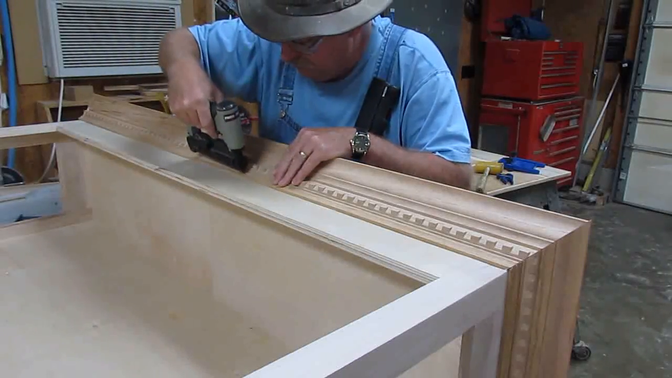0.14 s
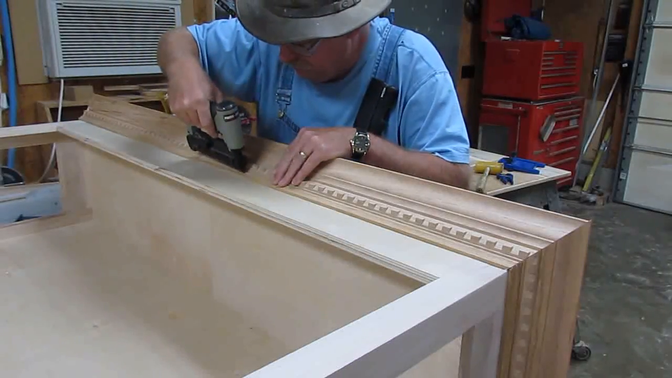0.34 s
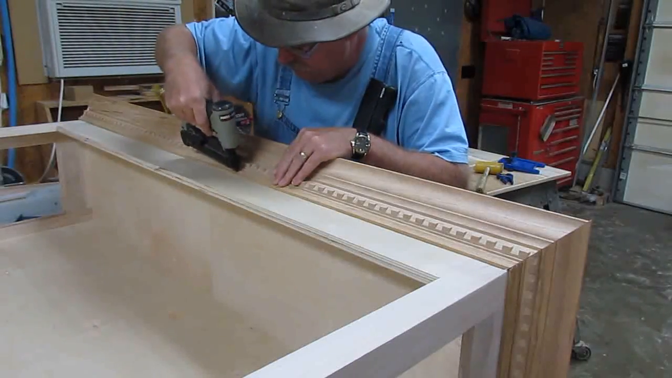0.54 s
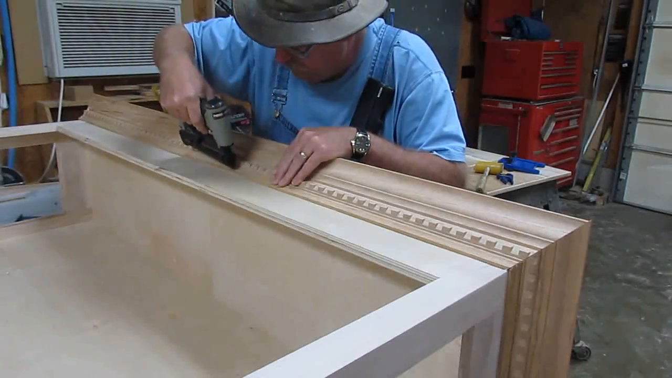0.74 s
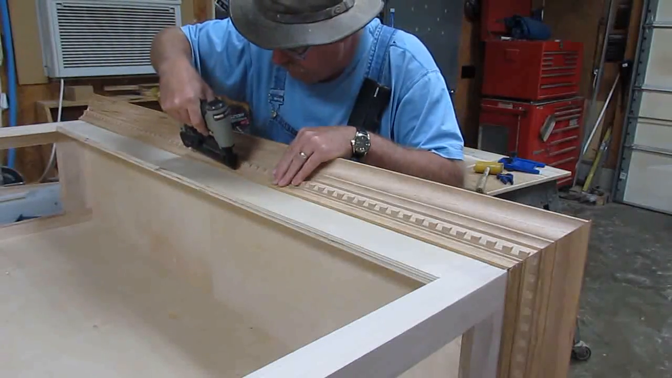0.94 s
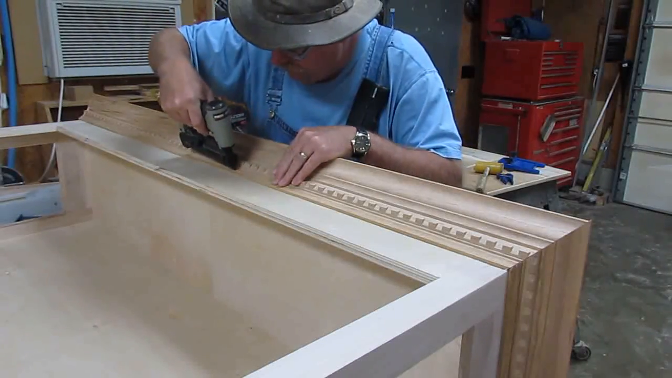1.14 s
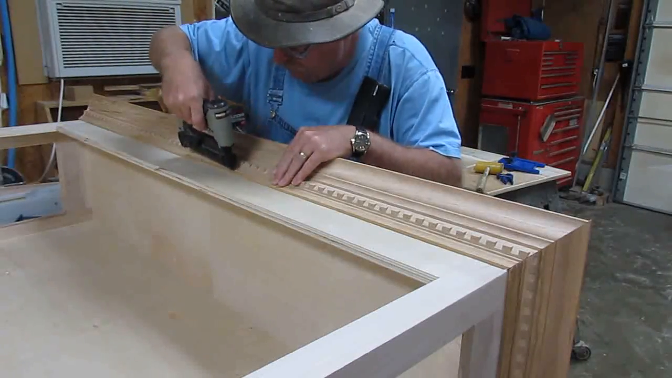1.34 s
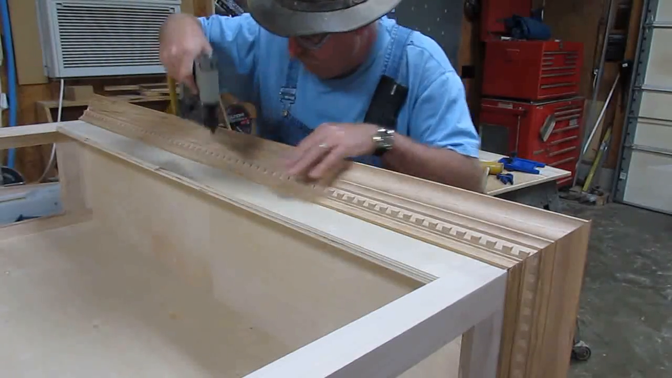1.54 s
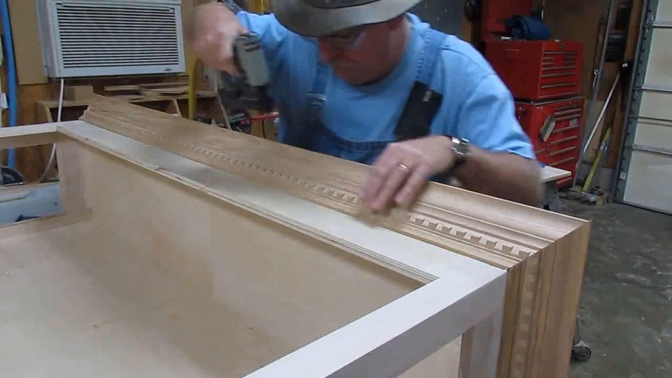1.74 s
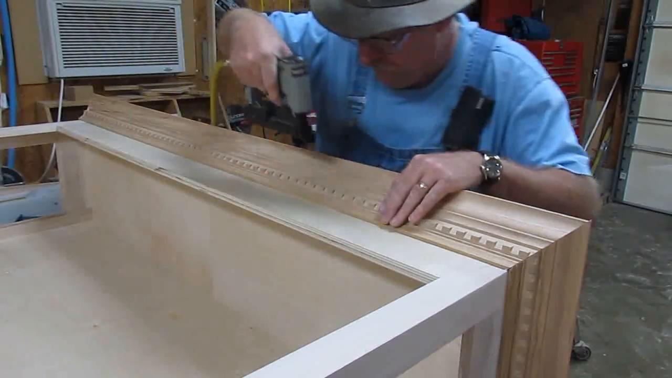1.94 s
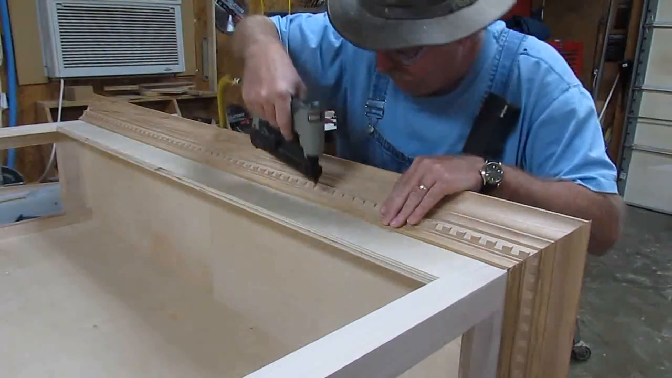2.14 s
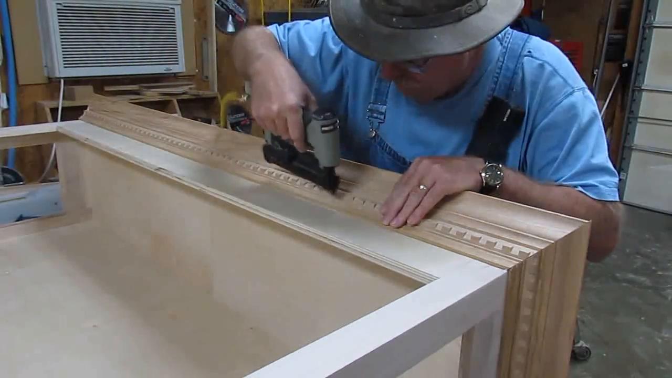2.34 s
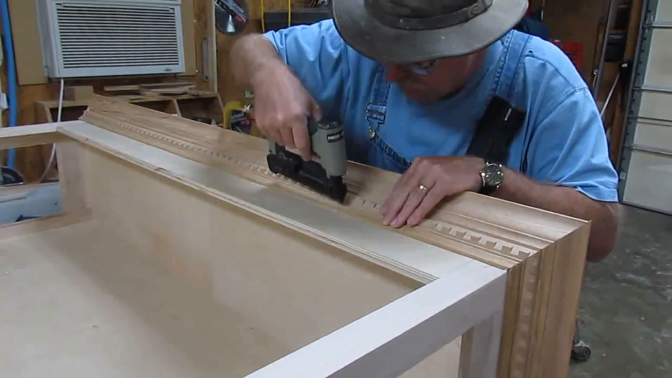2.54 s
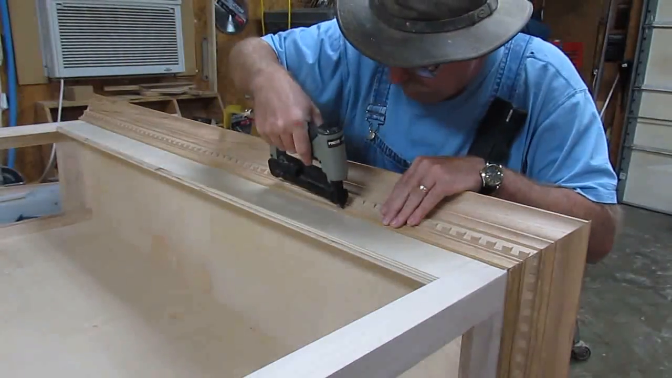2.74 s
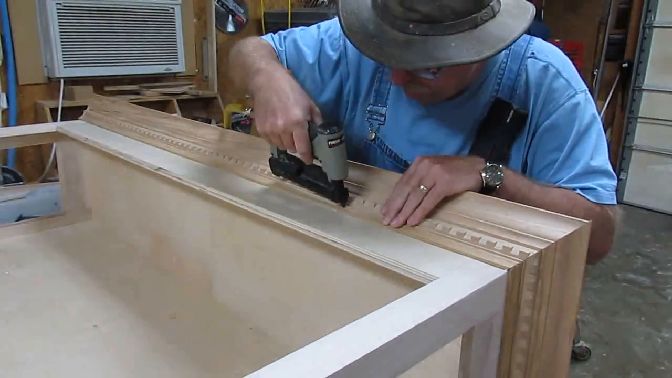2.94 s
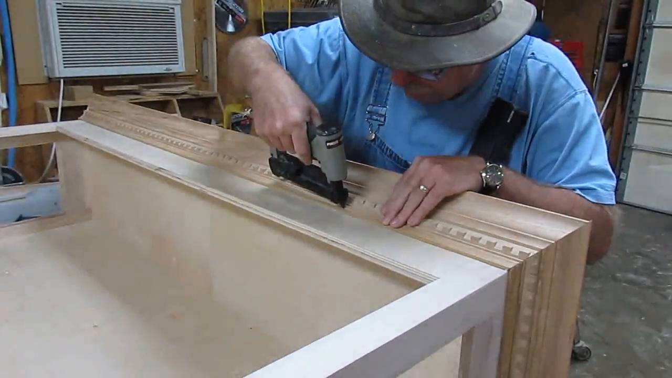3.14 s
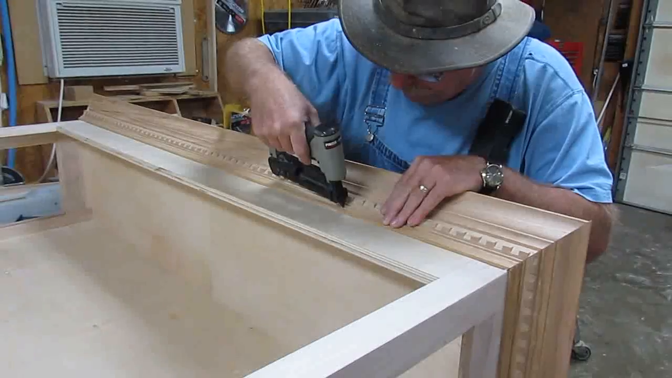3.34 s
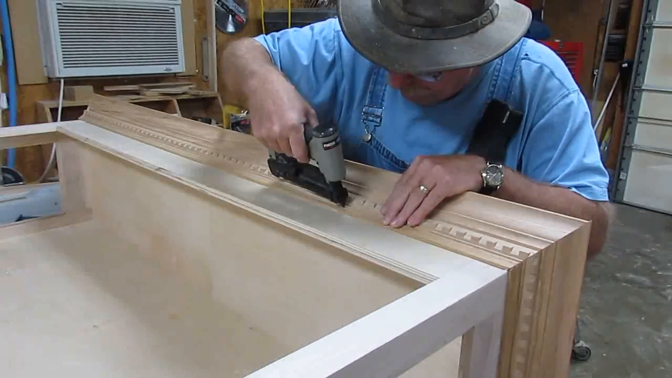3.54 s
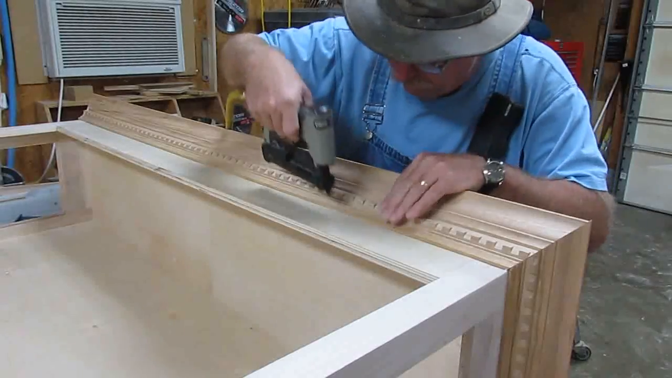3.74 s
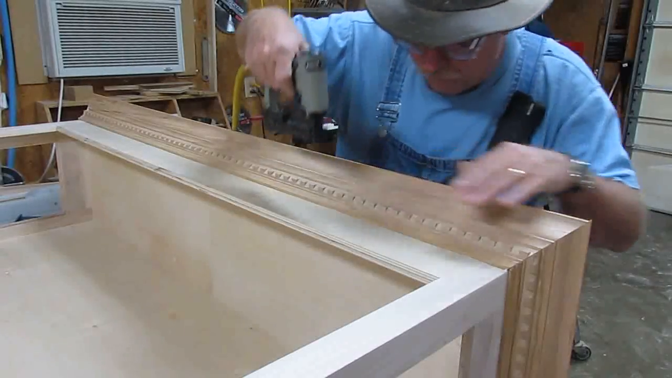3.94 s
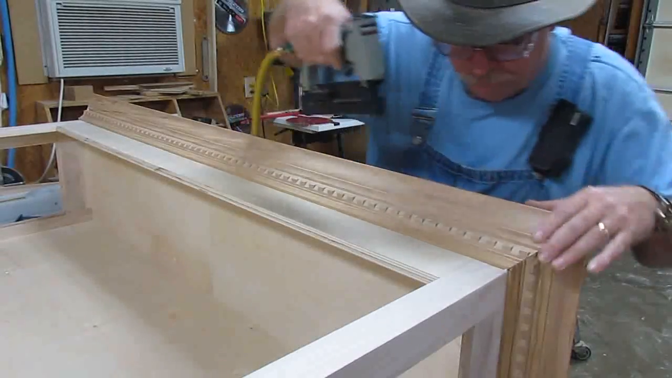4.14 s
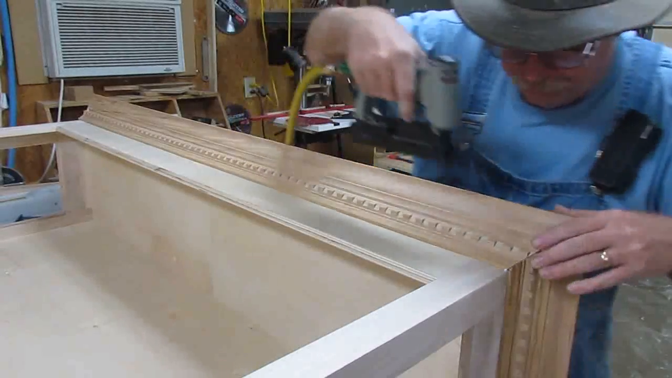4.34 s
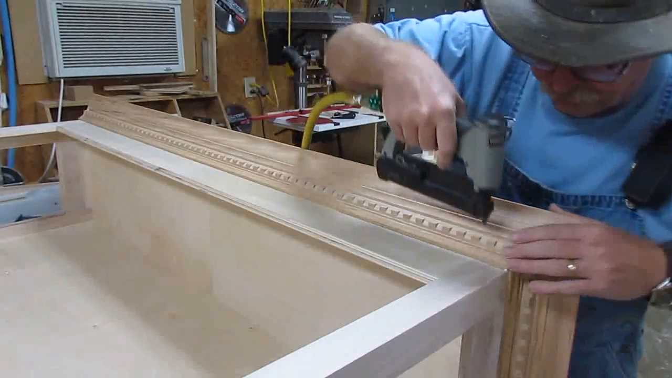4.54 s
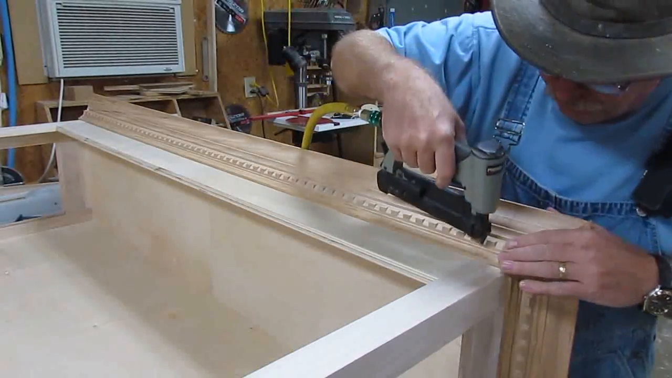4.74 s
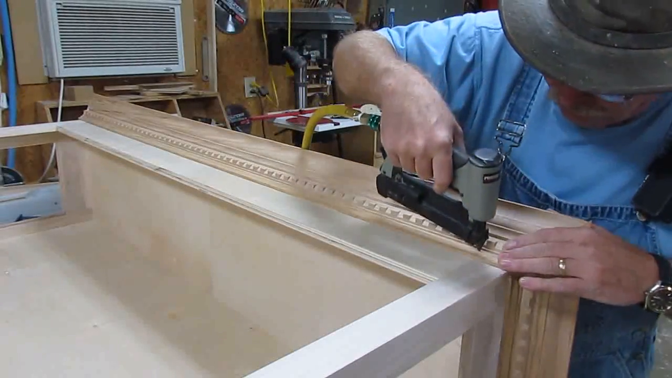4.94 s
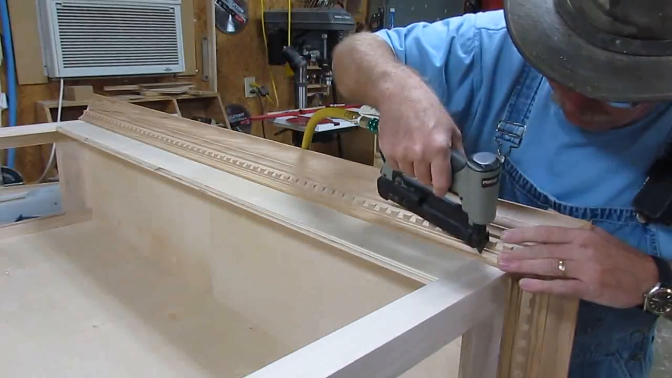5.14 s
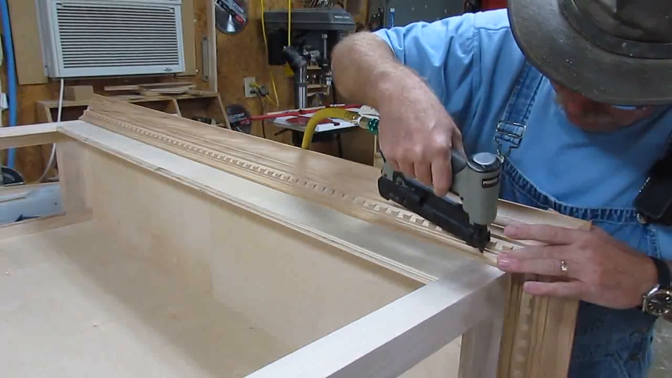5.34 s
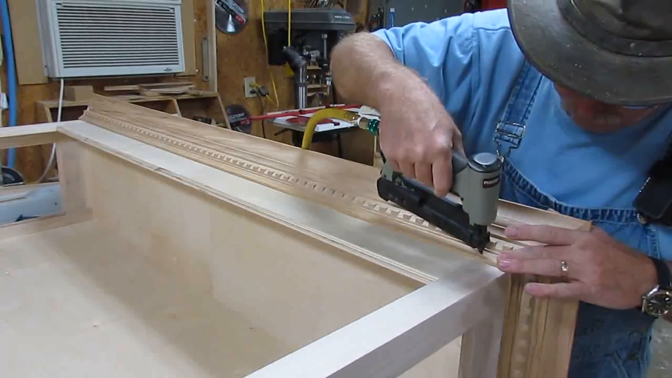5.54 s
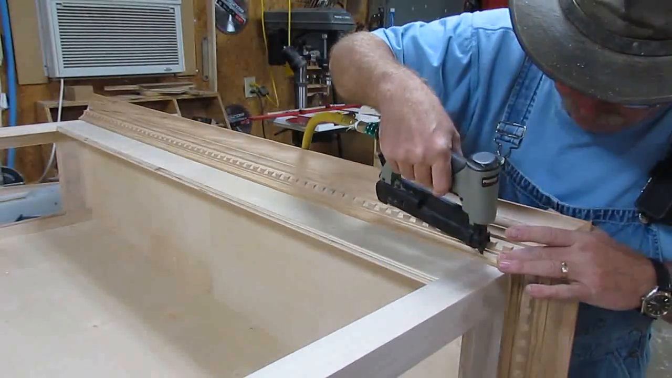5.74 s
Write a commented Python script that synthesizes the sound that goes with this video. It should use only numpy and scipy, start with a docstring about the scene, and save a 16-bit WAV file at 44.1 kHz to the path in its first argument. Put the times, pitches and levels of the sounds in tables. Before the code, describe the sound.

Close stereo microphones in a reverberant workshop: a pin nailer fires three times into a hollow wooden cabinet, each shot a bright, hard air crack followed quickly by a double-edged venting hiss. Between shots the tool lands with small knocks and scrapes, and a hand brushes over the wood. A steady low fan hum stays behind, dipping after each blast.

```python
"""Pin nailer on a hollow cabinet

Workshop interior, near stereo microphones: a pneumatic pin nailer fires three pins into cabinet molding.
Each shot is shaped noise for the air and filtered blows on ringing plywood; release vents a row of puffs.
Between shots the tool lands and scrapes, and a hand slides over the wood, as swelling noise and knocks.
Behind it a fan hums as coloured noise and the room adds a diffuse tail; the gain ducks on loud sound."""
import sys
import numpy as np
from scipy import signal
from scipy.fft import rfft, irfft
from scipy.io import wavfile
from scipy.ndimage import uniform_filter1d

SR = 44100
rng = np.random.default_rng(int(sys.argv[2]) if len(sys.argv) > 2 else 0)


def int16_out(signal):
    """Quantize to a 16-bit WAV file."""
    q = np.round(np.clip(np.atleast_2d(signal).T, -1, 1) * 32767)
    wavfile.write(sys.argv[1], SR, q.astype(np.int16))


N = 255320  # samples

# Fan hum, a spectrum of relative level: [f/Hz, level/dB per Hz]
HUM_SPECTRUM = [(15, -37), (25, -6), (87, -6), (175, -11), (212, -10.5), (363, -12.5), (516, -15.5),
                (887, -17.5), (1040, -16.5), (1160, -16.5), (1890, -21.5), (4740, -26), (16000, -35.5)]
HUM_DB = -58.5
FAN_TONE_HZ, FAN_TONE_DB = 1630, -76.5

# Room decay: [f/Hz, t60/s]
ROOM_T60 = [(100, 1), (260, 0.6), (700, 0.7), (1840, 0.81), (4850, 0.71), (12800, 0.38)]
# Room tail, relative spectrum: [f/Hz, level/dB]
ROOM_COLOUR = [(60, -3.5), (300, 13.5), (1000, 5), (3500, 9.5), (8000, 3), (15000, -3)]
ROOM_DB, ROOM_FADE_IN_S = -5.5, 0.0023

# Stereo width of diffuse sound: [f/Hz, side minus mid level/dB]
FAR_SIDE = [(60, -18.5), (110, 2), (200, -13), (380, -7.5), (700, -6), (1290, -5), (2380, -2.5), (4400, -3),
            (8120, 0), (15000, 0)]
NEAR_SIDE_DB, RUMBLE_SIDE_DB = -6.5, -6
LEFT_DB = -0.6  # the right gets the opposite

# Skin on wood, relative spectrum: [f/Hz, level/dB per Hz]
SKIN_SPECTRUM = [(880, -47), (1500, -12.5), (2230, -11), (4920, -8.5), (9010, -14), (13100, -23),
                 (14300, -21.5), (16000, -64.5)]
# Scraping on wood, relative spectrum: [f/Hz, level/dB per Hz]
SCRAPE_SPECTRUM = [(260, -45.5), (450, -4.5), (902, -0.5), (991, -1), (1580, -6), (1840, -12.5),
                   (3500, -15.5), (4550, -56.5), (7700, -120)]
# Hand and sleeve slide over the wood: [t/s, level/dB, rise/s, hold/s]
SLIDES = [(.1, -74, .05, .06), (.35, -56, 0.025, .06), (.48, -60.5, 0.047, .42), (1.7, -62, 0.024, .04),
          (1.79, -56, 0.011, .11), (1.93, -44, .06, 0.089), (2.0, -42, 0.11, 0.046),
          (2.3, -59.5, 0.019, .13), (2.7, -65.5, 0.068, .1), (3.1, -65, 0.11, .12), (3.9, -56.5, .06, .03),
          (4.08, -52.5, 0.017, .012), (4.25, -41.5, 0.15, .07), (4.68, -64.5, 0.032, .3),
          (5.2, -73, 0.024, .3)]
SLIDE_RISE_DB, SLIDE_FALL_DB_PER_S, SLIDE_BODY_DB = 19, 93.5, -16
# The tool's nose scrapes: [t/s, level/dB, rise/s, hold/s, chatter f/Hz, chatter level/dB]
SCRAPES = [(0.113, -72, 0.014, 0.065, 573, -48), (.36, -48, .035, 0.032, 1250, -51),
           (.49, -52, .025, 0.012, 2200, -56.5), (0.607, -51.5, .018, 0.011, 2490, -57.5),
           (.8, -58, .026, .04, 1200, -66), (2.32, -64, .03, .02, 900, -76),
           (4.09, -70.5, .03, 0.014, 1700, -66.5)]
SCRAPE_RISE_DB, SCRAPE_FALL_DB_PER_S = 13, 139
CHATTER_PER_S, CHATTER_CYCLES = 900, 19.5  # mean slip rate; cycles in a ring's t60
# Tool and hand press on the cabinet, one list per stretch between shots: [t/s, level/dB]
PRESSING = [
    [(0.0, -62), (0.136, -51), (0.25, -56), (0.752, -53.5), (0.906, -60.5), (1.1, -54)],
    [(1.72, -61.5), (2.056, -68.5), (2.354, -69), (2.638, -59), (2.766, -58.5), (2.842, -58), (3.42, -58.5)],
    [(3.9, -58), (4.192, -56), (4.382, -64.5), (5.052, -70.5), (5.374, -58.5), (5.494, -63), (5.57, -64.5)],
]
PRESSING_SCRAPE_DB, FRICTION_BAND_HZ = -12, (75, 460)

# Plywood cabinet modes: [f/Hz, level/dB, t60/s]
CABINET = [(44.77, -9.5, 0.16), (88.2, -6.5, 0.2), (141, -8.5, 0.15), (202.1, -5, 0.098),
           (261, -3.5, 0.064), (341.4, -5, 0.057), (484, -6.5, 0.044), (574, -7, 0.06), (656, -8, 0.052),
           (752, -5.5, 0.035), (870, -4.5, 0.038), (963, -14, 0.071), (1153, -1, 0.018),
           (1420, -7.5, 0.025), (1860, -11.5, 0.018), (2820, -12, .012)]
# The tool's mass shoves the panel, dry and short: [f/Hz, level/dB, t60/s]
THUMP = [(75, -5, 0.022), (210.4, -5, 0.014)]
# Knocks on the wood, each with fading repeats: landings of tool or hand, and a second thud
# during shot 2's venting: [t/s, click level/dB, click f/Hz, tap level/dB, tap f/Hz, thud level/dB,
# thud lag/ms, repeat gap/ms, loss per repeat/dB, thud lowest f/Hz, thud highest f/Hz]
KNOCK_SERIES = [(.066, -38, 1330, -38, 810, -31.5, -3, 27, 1.5, 77.7, 330),
                (0.813, -57, 1520, -59, 700, -37, 0.5, 26, 4.5, 82, 284),
                (2.581, -41.5, 2180, -40, 659, -36, -2.5, 24, 1.5, 75, 240),
                (2.8895, -41, 2630, -37, 610, -26, 8.5, 22, 7.5, 138, 290.4),
                (3.582, -40, 2300, -51, 600, -18, 1, 30, 6, 250, 432),
                (3.986, -59, 1980, -40, 680, -38.5, 2.5, 45, 4.5, 99, 430),
                (4.637, -58.5, 2020, -49, 534, -44.5, 4.5, 33, 4.5, 70, 322),
                (5.298, -39.5, 2166, -33.5, 900, -27.5, 3.5, 30, 7.5, 72.1, 276)]
TAP_SPREAD, REPEAT_JITTER = 1.4, .12  # factor down and up; multiplies half a normal draw
CLICK_T60_MS, CLICK_RING_DB, CLICK_RING_T60_S = 42, -7, 0.0062

# Shots: [t/s, level/dB, valve opening/ms, driver stroke/ms, driver clack f/Hz, blow delay/ms,
# blow level/dB, recoil level/dB, rebound level/dB, rebound f/Hz, trigger held/s, piston return level/dB]
SHOTS = [(1.1238, 1.5, 1.7, 5.9, 3400, 0.54, -18.5, -16.5, -5, 780, .1391, -22),
         (3.444, 1, 1.2, 7.3, 4830, 0.35, -16.5, -13.5, -20.5, 460, .1055, -21.5),
         (5.5860, 0, 4, 8.5, 4050, 7.5, -22, -21, -35.5, 600, .1493, -23.5)]
# Parts of the driver's blow on the wood: [delay/ms, level/dB, lowest f/Hz, highest f/Hz]
BLOW = [(0.1, 4.5, 150, 2400), (4.499, -3, 400.6, 1708)]
REBOUND_MS, REBOUND_SPREAD = 12, 1.3  # delay after the blow; factor down and up
RETURN_MS, RETURN_BAND_HZ, RETURN_THUMP_DB = 1.58, (184, 790), 9

# Air puffs along the driver's stroke: [t/share of stroke, level/dB, rise/ms, t60/ms, nominal f/Hz]
STROKE = [(.58, 2.5, 1.6, 25, 8300), (0.6, -3, 1.5, 50, 1720)]
# Puffs of the venting valve after release: [delay/ms, level/dB, rise/ms, t60/ms, nominal f/Hz]
VENT = [(0.0927, -4, 0.94, 20.4, 10300), (4.484, -5.5, 2.4, 120, 25000), (7.014, -12.5, 1.5, 280, 8600),
        (2.95, -2, 1.04, 19, 1480), (33.2, 11, 2.1, 12, 9500), (40.12, 4.9, 0.89, 18.5, 19000),
        (44.7, 4.5, 2.12, 18.6, 6270), (43.5, -10, 3.6, 62, 1560)]
# Faint high ticks of the tool: [t/s, level/dB, t60/ms, nominal f/Hz]
TICKS = [(1.7933, -45, 180, 6000), (5.1988, -43, 22, 6900), (5.582, -32, 41, 7930)]
TICK_RISE_MS = .4
# The tool's metal rings after a puff: [f/Hz, level/dB, t60/s]
METAL = [(3110, -24.5, .017), (3890, -23, .017)]
OPENING_DB, OPENING_T60_MS, OPENING_HZ, OPENING_SHOULDER = 1, 49, 9720, 0.27
CLACK_DB, CLACK_RISE_MS, CLACK_T60_MS = 2.26, 0.22, 18
NOZZLE_HZ, NOZZLE_DB, NOZZLE_T60_S = 9100, -21, 0.0024
AIR_LOW_HZ = 600

# Microphone and recorder; the fall of the held excess is scaled by the squeeze
MIC_HZ, CUTOFF_HZ = 13200, 16200
KNEE_DB, EXCESS_FALL_DB_PER_S, SQUEEZE = -28, 19, 0.39


def amp(db):
    """Decibels to gain."""
    return 10 ** (np.asarray(db) / 20)


def rms_one(x):
    """Scale to rms 1."""
    return x / np.sqrt(np.mean(x ** 2) + 1e-20)


def at_hz(points, hz):
    """Read a (Hz, value) table on a log frequency axis."""
    table_hz, values = np.transpose(points)
    return np.interp(np.log(hz), np.log(table_hz), values)


def band_pass(x, low_hz, high_hz):
    """Keep the sound between two frequencies."""
    return signal.sosfilt(signal.butter(2, [low_hz, high_hz], "band", fs=SR, output="sos"), x)


def ring(x, modes):
    """Excite parallel resonances that each decay exponentially, with alternating signs."""
    out = 0
    for k, (hz, db, t60) in enumerate(modes):
        radius = amp(-60 / (max(t60, .001) * SR))
        angle = 2 * np.pi * hz / SR
        poles = [1, -2 * radius * np.cos(angle), radius * radius]
        mode = signal.lfilter([0, np.sin(angle)], poles, x + 1e-18)
        out = out + (-1) ** k * amp(db) * mode
    return out


def to_stereo(mid, side):
    """Mid and side to left and right."""
    return np.array([mid + side, mid - side])


def coloured(spectrum, size=N):
    """Diffuse stereo noise of a given spectrum, at rms 1."""
    hz = np.maximum(np.fft.rfftfreq(size, 1 / SR), 10)
    mid, side = rfft(rng.standard_normal((2, size))) * amp(at_hz(spectrum, hz))
    side = side * amp(at_hz(FAR_SIDE, hz))
    return rms_one(irfft(to_stereo(mid, side), size))


def swell(rows, rise_db, fall_db_per_s):
    """Gain of strokes that rise, hold and fall in dB; overlapping ones add in power."""
    t, power = np.arange(N) / SR, 0
    for s, db, rise_s, hold_s in rows:
        rise_below = rise_db * np.maximum(1 - (t - s) / rise_s, 0)
        fall_below = fall_db_per_s * np.maximum(t - s - rise_s - hold_s, 0)
        power = power + amp(db - rise_below - fall_below) ** 2
    return np.sqrt(power)


def fan():
    """Steady broadband hum, with a faint narrow band where noise excites one resonance."""
    tone = rms_one(ring(rng.standard_normal(N), [(FAN_TONE_HZ, 0, .3)]))
    return amp(HUM_DB) * coloured(HUM_SPECTRUM) + amp(FAN_TONE_DB) * tone


def workshop(x):
    """Reverberation: the sound is spread by diffuse noise that dies band by band."""
    size = SR + SR // 4
    t, tail = np.arange(size) / SR, 0
    noise = [coloured(ROOM_COLOUR, size), coloured(ROOM_COLOUR, size)]  # neighbouring bands are unrelated
    edges = 45 * 2 ** np.arange(0, 9, .5)
    for k, (low, high) in enumerate(zip(edges, edges[1:])):
        decay = amp(-60 * t / at_hz(ROOM_T60, np.sqrt(low * high)))
        tail = tail + band_pass(noise[k % 2], low, high) * decay
    tail = tail * np.clip(t / ROOM_FADE_IN_S, 0, 1) ** 2
    tail = tail / np.sqrt(np.sum(tail ** 2) / 2)
    return amp(ROOM_DB) * signal.fftconvolve(x[None], tail, axes=1)[:, :N]


def chatter():
    """The scraping nose sticks and slips at random, and each slip rings briefly."""
    slips = (rng.random(N) < CHATTER_PER_S / SR) * rng.standard_normal(N)
    out = 0
    for s, _, rise_s, hold_s, hz, db in SCRAPES:
        gain = swell([(s, db, rise_s, hold_s)], SCRAPE_RISE_DB, SCRAPE_FALL_DB_PER_S)
        out = out + gain * rms_one(ring(slips, [(hz, 0, CHATTER_CYCLES / hz)]))
    return out


def handling():
    """Skin hisses on the wood, the tool scrapes and chatters, and friction rumbles in the cabinet."""
    t = np.arange(N) / SR
    pressing = 0
    for rows in PRESSING:
        pressing = pressing + amp(np.interp(t, *np.transpose(rows), left=-200, right=-200))
    pressing = uniform_filter1d(pressing, size=800)

    skin = swell(SLIDES, SLIDE_RISE_DB, SLIDE_FALL_DB_PER_S)
    scrape = swell([row[:4] for row in SCRAPES], SCRAPE_RISE_DB, SCRAPE_FALL_DB_PER_S)
    scrape = scrape + amp(SLIDE_BODY_DB) * skin + amp(PRESSING_SCRAPE_DB) * pressing
    # the scrape catches and slips: its level wavers by 1.4 dB rms
    grit = amp(1.4 * rms_one(uniform_filter1d(rng.standard_normal(N), size=150)))
    scraping = scrape * rms_one(grit * coloured(SCRAPE_SPECTRUM))

    friction = band_pass(rng.standard_normal((2, N)), *FRICTION_BAND_HZ)
    mid, side = pressing * rms_one(ring(friction, CABINET))
    rumble = to_stereo(mid, amp(RUMBLE_SIDE_DB) * side)
    return skin * coloured(SKIN_SPECTRUM) + scraping + chatter() + rumble


def repeating_blows():
    """Each knock is a tap and a thud with four fading repeats, as (s, dB, lowest Hz, highest Hz)."""
    rows = []
    uneven = rng.standard_normal((len(KNOCK_SERIES), 5))
    for knock, chance in zip(KNOCK_SERIES, uneven):
        s, _, _, tap_db, tap_hz, thud_db, lag_ms, gap_ms, loss_db, *band = knock
        rows.append((s, tap_db, tap_hz / TAP_SPREAD, tap_hz * TAP_SPREAD))
        for k in range(5):
            thud_ms = lag_ms + k * gap_ms * (1 + REPEAT_JITTER * chance[k] / 2)
            rows.append((s + thud_ms / 1000, thud_db - k * loss_db, *band))
    return rows


def shot_blows():
    """Driver, rebound and piston return strike the wood, as (s, dB, lowest Hz, highest Hz)."""
    rows = []
    for s, *_, blow_ms, blow_db, _, rebound_db, rebound_hz, held_s, return_db in SHOTS:
        rows += [(s + (blow_ms + ms) / 1000, blow_db + db, *band) for ms, db, *band in BLOW]
        rebound_s = s + (blow_ms + REBOUND_MS) / 1000
        rows.append((rebound_s, rebound_db, rebound_hz / REBOUND_SPREAD, rebound_hz * REBOUND_SPREAD))
        rows.append((s + held_s + RETURN_MS / 1000, return_db, *RETURN_BAND_HZ))
    return rows


def knocks():
    """Each blow is a click with a rough rattle behind it; its band picks the cabinet modes."""
    size = 3000
    force = np.zeros(N + size)
    for s, db, low_hz, high_hz in repeating_blows() + shot_blows():
        push = .04 * np.exp(-np.arange(size) / (.004 * SR)) * rng.standard_normal(size)
        push[0] = 1
        push = band_pass(push, low_hz, max(high_hz, 1.2 * low_hz))
        start = round(s * SR)
        force[start:start + size] += amp(db) * push
    return ring(force[:N], CABINET)


def thumps():
    """Recoil and piston return each give the panel one dull shove."""
    shoves = np.zeros(N)
    for s, *_, blow_ms, _, recoil_db, _, _, held_s, return_db in SHOTS:
        shoves[round((s + blow_ms / 1000) * SR)] = amp(recoil_db)
        shoves[round((s + held_s + RETURN_MS / 1000) * SR)] = amp(return_db + RETURN_THUMP_DB)
    return ring(shoves, THUMP)


def puffs(rows, shoulder):
    """Noise bursts: a short rise, an exponential fall, a broad hump over a flat shoulder."""
    out = np.zeros((2, N + SR))
    t = np.arange(SR // 2) / SR
    high_pass = signal.butter(2, AIR_LOW_HZ, "high", fs=SR, output="sos")
    for s, db, rise_ms, t60_ms, hz in rows:
        rise = np.minimum(1000 * t / max(rise_ms, .1), 1) ** 2
        fall = amp(-60000 * t / max(t60_ms, 2))
        burst = rfft(rise * fall * rng.standard_normal((2, len(t))))
        # jet noise is dense: its spectrum is even on a scale of 300 Hz
        power = np.abs(burst) ** 2
        flatten = np.sqrt(power.mean() / (uniform_filter1d(power, size=150) + 1e-20))
        burst = irfft(burst * flatten, len(t)) * (t < .45)
        hump = band_pass(burst, hz / 1.517, min(hz * 1.407, .45 * SR))
        mid, side = amp(db) * (hump + shoulder * signal.sosfilt(high_pass, burst))
        # the two microphone ports differ more as the pitch rises
        side = amp(NEAR_SIDE_DB) * np.diff(side, prepend=0)
        start = round(s * SR)
        out[:, start:start + len(t)] += to_stereo(mid, side)
    return out[:, :N]


def clicks():
    """The tool ticks faintly, and each series of knocks opens with a click and a short ring."""
    ticks = [(s, db, TICK_RISE_MS, t60_ms, hz) for s, db, t60_ms, hz in TICKS]
    rings = 0
    for s, db, hz, *_ in KNOCK_SERIES:
        ticks.append((s, db, TICK_RISE_MS, CLICK_T60_MS, hz))
        impulse = np.arange(N) == round(s * SR)
        rings = rings + ring(impulse, [(hz, db + CLICK_RING_DB, CLICK_RING_T60_S)])
    return rings + puffs(ticks, shoulder=0.054)


def nailer():
    """Air bursts through the valve, driver and vent; the jet sings in the nozzle, jolts ring the metal."""
    air, openings = [], []
    for s, db, opening_ms, stroke_ms, clack_hz, *_, held_s, _ in SHOTS:
        opened = s + opening_ms / 1000
        openings.append((s, db + OPENING_DB, opening_ms, OPENING_T60_MS, OPENING_HZ))
        for share, level_db, *rest in STROKE:
            air.append((opened + share * stroke_ms / 1000, db + level_db, *rest))
        air.append((opened + stroke_ms / 1000, db + CLACK_DB, CLACK_RISE_MS, CLACK_T60_MS, clack_hz))
        for delay_ms, level_db, *rest in VENT:
            air.append((s + held_s + delay_ms / 1000, level_db, *rest))
    jolts = np.zeros(N)
    for s, db, *_ in air:
        jolts[round(s * SR)] += amp(db) * rng.choice([-1, 1])
    jet = puffs(openings, shoulder=OPENING_SHOULDER)
    jet = jet + ring(jet, [(NOZZLE_HZ, NOZZLE_DB, NOZZLE_T60_S)])
    return jet + puffs(air, shoulder=0.37) + ring(jolts, METAL) + clicks()


def scene():
    """Fan, room, handling, cabinet and tool; only the tool and knocks feed the reverberation."""
    near = nailer() + knocks()
    total = fan() + workshop(near.mean(axis=0)) + handling() + thumps() + near
    return total * amp([[LEFT_DB], [-LEFT_DB]])


def record(dry):
    """The microphone rolls off; gain ducks on loud sound and creeps back; peaks clip; the top is cut."""
    dry = signal.sosfilt(signal.butter(4, MIC_HZ, fs=SR, output="sos"), dry)
    level_db = 10 * np.log10(uniform_filter1d(np.mean(dry ** 2, axis=0), size=441) + 1e-12)
    excess_db = np.maximum(level_db - KNEE_DB, 0)
    # hold each peak of the excess and let it fall at a steady rate
    ramp = EXCESS_FALL_DB_PER_S * np.arange(N) / SR
    held_db = np.maximum.accumulate(excess_db + ramp) - ramp
    pole = np.exp(-1 / (0.011 * SR))  # the attack lags, so the blast passes
    gain = amp(-SQUEEZE * signal.lfilter([1 - pole], [1, -pole], held_db))
    clipped = np.clip(dry * gain, -1, 1)
    return signal.sosfilt(signal.cheby2(12, 60, CUTOFF_HZ, fs=SR, output="sos"), clipped)


dry = scene()
out = record(dry)
int16_out(out)
```